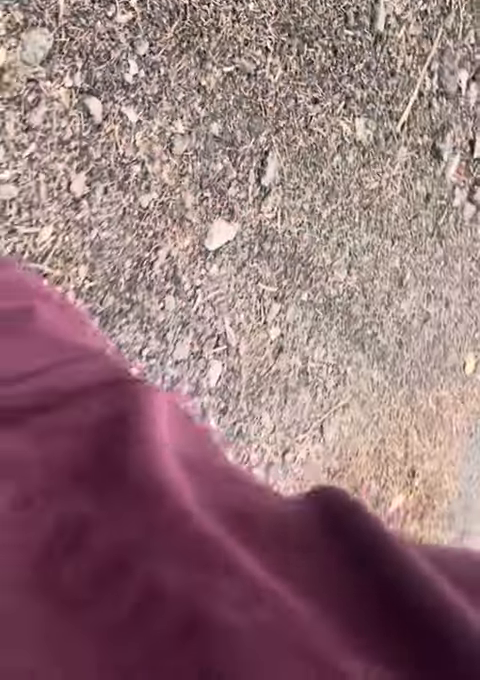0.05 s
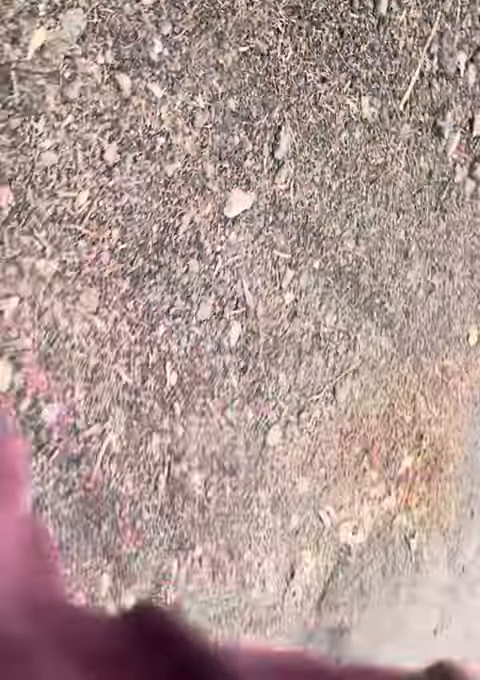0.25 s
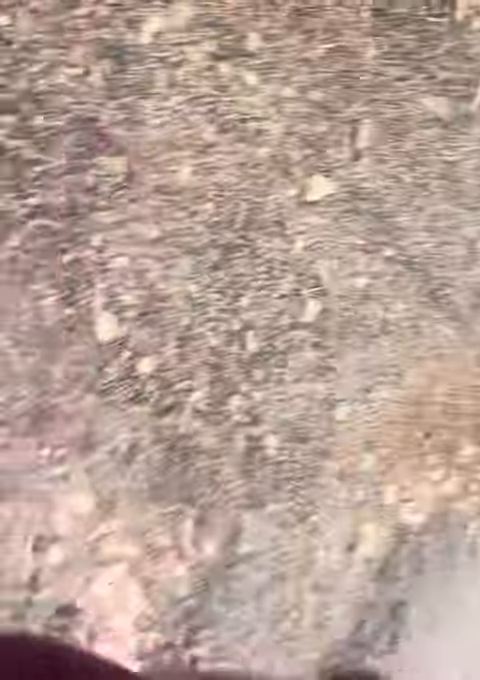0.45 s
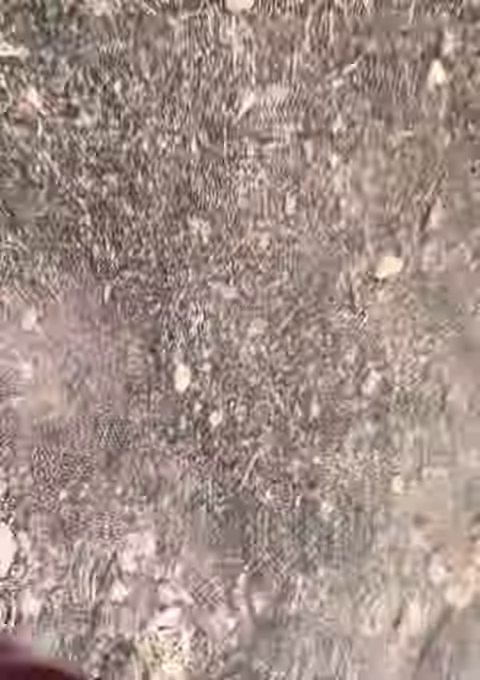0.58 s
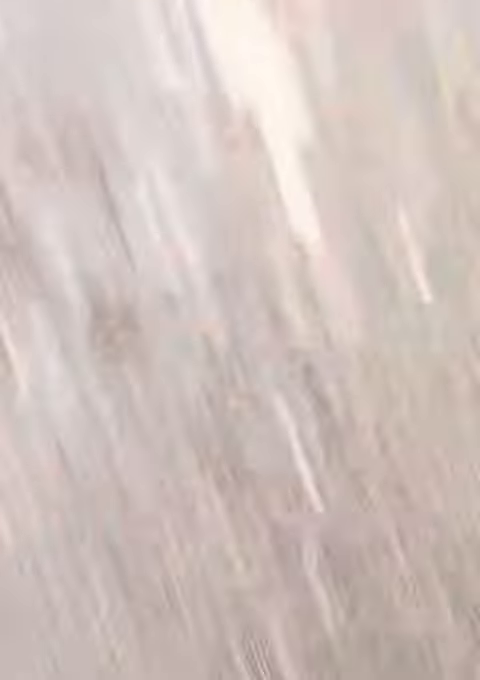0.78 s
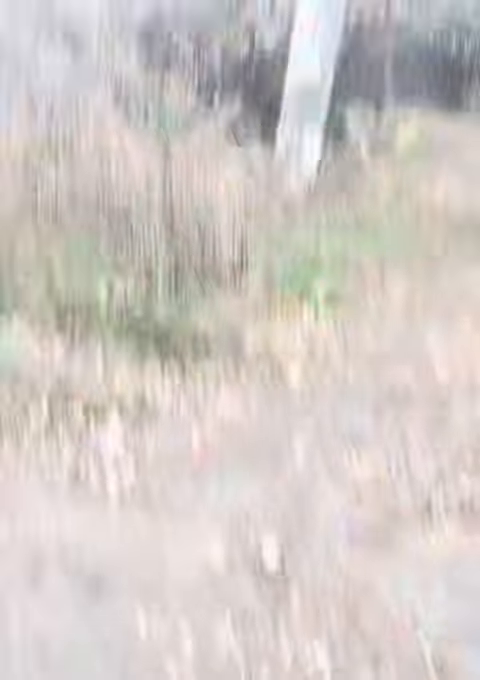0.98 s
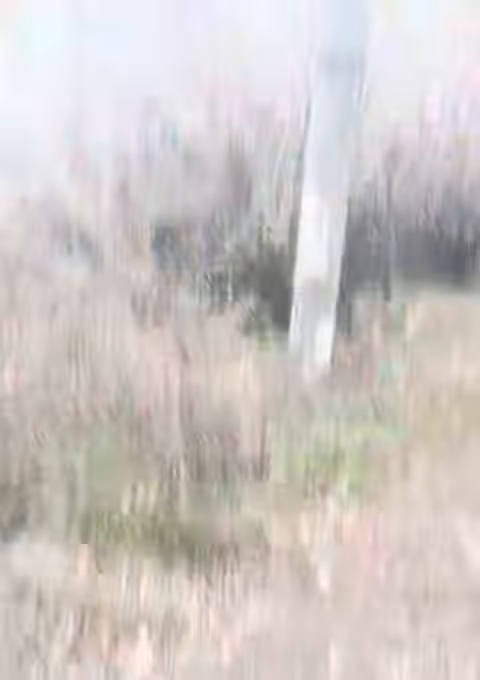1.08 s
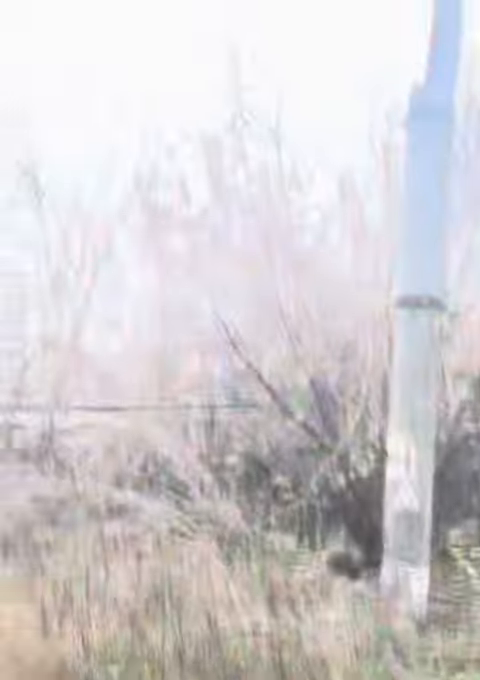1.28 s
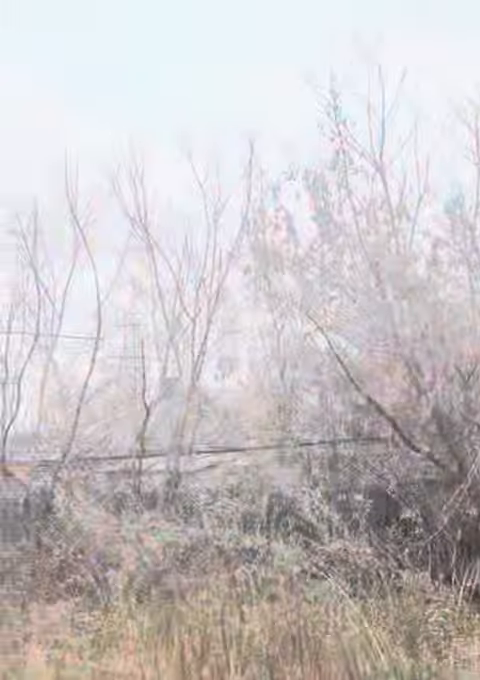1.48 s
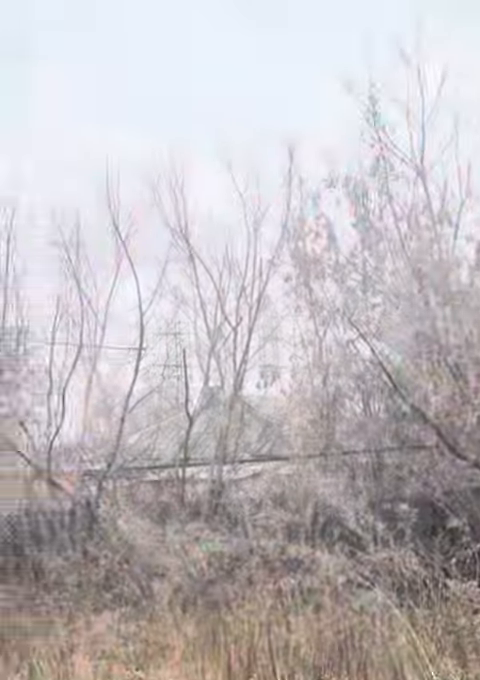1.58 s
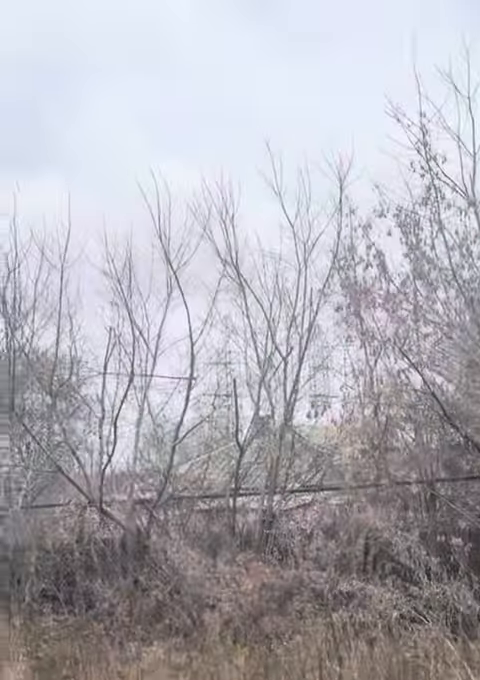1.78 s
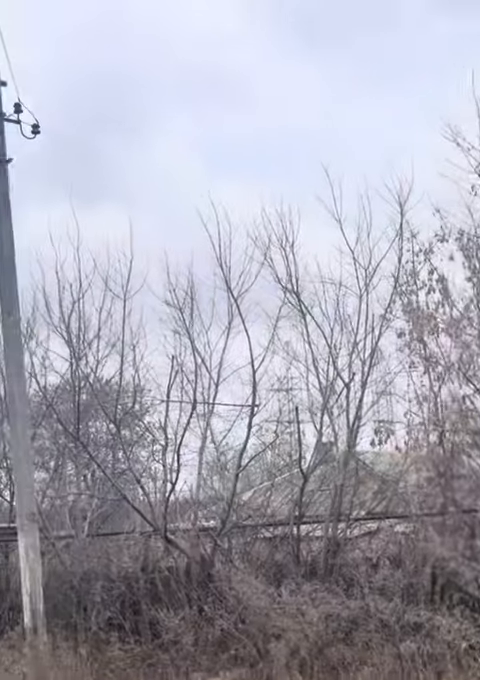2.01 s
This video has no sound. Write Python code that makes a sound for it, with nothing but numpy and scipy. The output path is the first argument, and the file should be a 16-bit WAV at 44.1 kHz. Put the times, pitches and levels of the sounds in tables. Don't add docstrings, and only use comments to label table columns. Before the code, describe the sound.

A heavy explosion hits almost at once with a dull deep thump, then dense echoes and a low rumble fade across open scrubland; faint cloth rustle and dry grit ticks close to the handheld phone.

```python
import sys
import numpy as np
from scipy import signal
from scipy.fft import rfft, irfft, next_fast_len
from scipy.io import wavfile
from scipy.ndimage import uniform_filter1d

SR = 44100
rng = np.random.default_rng(int(sys.argv[2]) if len(sys.argv) > 2 else 0)


def digitize_waveform(pressure):
    field = np.atleast_2d(pressure).T
    bounded = np.clip(field, -1, 1)
    quanta = np.round(bounded * 32767).astype(np.int16)
    wavfile.write(sys.argv[1], SR, quanta)


def invert_db(x):
    u = np.asarray(x, float) / 20
    return 10 ** u


N = 90404
T = np.arange(N) / SR
LOWS = np.geomspace(24, 420, 11)
MIDS = np.geomspace(140, 3600, 13)
HIGHS = np.geomspace(1800, 16500, 10)


def rms_one(x):
    return x / np.sqrt(np.mean(x ** 2) + 1e-20)


def at_hz(points, hz):
    table_hz, value = np.transpose(points)
    return np.interp(np.log(hz), np.log(table_hz), value)


def over_time(points):
    return invert_db(np.interp(T, *np.transpose(points)))


def cut(x, hz, kind, order=2):
    return signal.sosfilt(signal.butter(order, hz, kind, fs=SR, output="sos"), x)


def drift(rate_hz):
    pole = np.exp(-80 * np.pi * rate_hz / SR)
    noise = rng.standard_normal(N // 40 + 2002)
    slow = signal.lfilter([1], [1, -2 * pole, pole * pole], noise)[2000:]
    return np.interp(np.arange(N) / 40, np.arange(len(slow)), rms_one(slow))


def swarm(per_s, spread_db):
    size_db = spread_db * np.minimum(rng.exponential(1, (4, N)), 5)
    size = invert_db(size_db) * rng.choice([-1, 1], (4, N))
    arrives = rng.random((4, N)) < per_s / SR
    return rms_one(size * (arrives + 1e-9)).reshape(2, 2, N)


def banded(source, spectrum, patchy_db, edges, tilt_db=0):
    out, power = 0, 0
    together = drift(2.5)
    for k, (low_hz, high_hz) in enumerate(zip(edges, edges[1:])):
        hz = np.sqrt(low_hz * high_hz)
        flicker_db = patchy_db * (0.6 * together + drift(20))
        band = invert_db(at_hz(spectrum, hz) + flicker_db) * cut(source[k % 2], [low_hz, high_hz], "band")
        out = out + band * invert_db(tilt_db * np.log2(hz / 500))
        power = power + np.mean(band ** 2)
    return out / np.sqrt(power)


# (frequency [Hz], density [dB per Hz])
HUM_SPECTRUM = [(25, -15), (50, 2.5), (103, -5), (346, -23.5), (1400, -30), (2200, -43.5), (3000, -51)]


def hum():
    edges = np.append(LOWS[:6], MIDS[1:])
    return invert_db(-46) * banded(rng.standard_normal((2, 2, N)), HUM_SPECTRUM, 1.8, edges)


# (time [s], level [dB])
RUB = [(0, -67.5), (.17, -65.5), (.215, -51), (.235, -66.5), (.3, -79), (.667, -81.5), (.679, -53.5),
       (.695, -58.5), (.712, -61), (.8, -70), (.87, -72.5), (1.1, -80), (1.16, -73.5), (1.22, -83),
       (1.47, -86), (1.49, -80), (1.53, -89), (2.05, -94)]
# (frequency [Hz], density [dB per Hz])
CLOTH = [(2600, -8), (4600, -1), (6000, 2.5), (8000, -6.5), (10500, -2.5), (12500, -13), (14000, -10),
         (16000, -13.5)]
# (frequency [Hz], density [dB per Hz])
AIR = [(1800, -2), (2700, 5), (4000, 2.5), (5200, 1.5), (6500, -4), (9500, -14.5), (11500, -10),
       (16000, -33.5)]
AIR_DB, HISS_CUT_HZ = -72, 9500
GRAINS_PER_S, GRAIN_SPREAD_DB = 4900, 3.5


def rustle():
    grains = banded(swarm(GRAINS_PER_S, GRAIN_SPREAD_DB), CLOTH, 1.3, HIGHS)
    hiss = banded(rng.standard_normal((2, 2, N)), AIR, 0.6, HIGHS)
    return invert_db(0.5) * over_time(RUB) * grains + invert_db(AIR_DB) * cut(hiss, HISS_CUT_HZ, "low", order=4)


# (time [s], peak level [dB], low edge [Hz], high edge [Hz])
TICKS = [(.153, -48.5, 3520, 4580), (0.185, -47, 3000, 15100), (0.211, -54, 4300, 5200),
         (0.22, -45, 3500, 15500), (0.685, -38, 8500, 11300), (0.69, -56.5, 4000, 10600),
         (0.7606, -33, 5300, 11500), (.739, -63, 7000, 11500), (.781, -51, 6500, 11000),
         (.333, -63.5, 7500, 8420), (.948, -63, 3100, 4200), (0.764, -37.5, 5600, 9900),
         (.770, -42, 6500, 12000), (0.789, -39, 5500, 14500), (0.793, -37.5, 5800, 12700),
         (.8225, -50, 8000, 15000), (0.843, -41, 4400, 15300), (0.981, -54.5, 7000, 15860),
         (1.14, -49.5, 4300, 5630), (1.1388, -55.5, 6500, 11100), (1.145, -56, 3050, 5600),
         (1.181, -58.5, 3640, 5500), (1.474, -56, 2450, 3600), (1.4774, -45, 4850, 6600),
         (1.484, -46, 2500, 4600), (1.492, -52, 2500, 5000)]
TICK_DECAY_S, SNAP = 0.0014, 8.8


def ticks():
    out = np.zeros((2, N + SR))
    noise = rng.standard_normal((len(TICKS), 2, 600))
    noise[:, 0, 0] = SNAP
    for (s, db, low_hz, high_hz), burst in zip(TICKS, noise):
        snap = cut(burst * np.exp(-T[:600] / TICK_DECAY_S), [low_hz, high_hz], "band")
        start = int(s * SR) - 20
        out[:, start:start + 600] += invert_db(db) * snap / np.abs(snap).max()
    return out[:, :N]


def evened(x):
    window_s, share = 0.42, 0.95
    power = uniform_filter1d(x[0] ** 2, size=int(window_s * SR)) + 1e-3
    return x / power ** (share / 2)


# (time [s], level [dB])
BOOM = [(0.235, -15.5), (.3, -17.5), (0.4, -17), (0.5, -19), (.58, -28.5), (0.65, -20.5), (0.8, -24.5),
        (.95, -25.5), (1.05, -27), (1.15, -30), (1.25, -27), (1.4, -33), (1.58, -36), (1.75, -38),
        (1.95, -32), (2.05, -36.5)]
# (frequency [Hz], density [dB per Hz])
RUMBLE = [(25, -20.5), (40, -12.5), (56, -0.5), (95, 2.5), (150, -9), (220, -12), (300, -23), (400, -29.5)]
# (time [s], level [dB], brightness [dB per octave])
ROAR = [
    (0.235, -23, -1.5),
    (0.253, -24.5, 3.5),
    (0.267, -17, 1.5),
    (0.362, -29, 0),
    (0.596, -38, 1),
    (0.99, -39.5, -1),
    (1.876, -49.5, 0.5),
    (1.885, -45.5, -2.5),
    (2.05, -48.5, 1.5),
]
# (frequency [Hz], density [dB per Hz])
SCATTER = [(150, -12), (250, 2), (500, -1.5), (800, -10), (1300, -21.5), (2000, -40), (2800, -48.5),
           (3600, -66)]
FRONT_S, RISE_S = 0.2275, 0.0069
BOOM_TRIM_DB, ROAR_TRIM_DB = -1.83, 0.5
ROLL_CUT_HZ = 2300


def roll():
    boom = evened(banded(swarm(2500, 1.5), RUMBLE, -0.2, LOWS))
    boom = invert_db(BOOM_TRIM_DB) * over_time(BOOM) * boom
    s, db, tilt = np.transpose(ROAR)
    roar = banded(swarm(3000, 1.99), SCATTER, 1.6, MIDS, np.interp(T, s, tilt))
    roar = invert_db(np.interp(T, s, db) + ROAR_TRIM_DB) * roar
    gate = np.clip((T - FRONT_S) / RISE_S, 0, 1) ** 2
    return cut(gate * (boom + roar), ROLL_CUT_HZ, "low", order=4)


# (time [s], peak level [dB], pulse length [ms], polarity
ECHOES = [(0.2349, 0.3, 7.4, -1), (0.2477, -2.5, 11, -1), (0.2694, -1.5, 10, -1), (0.2812, -10.5, 7.2, 1),
          (0.293, -6, 8.7, 1), (0.3033, -1.5, 7.6, 1), (0.3125, -3.5, 9.6, 1), (0.3319, -13, 14, 1),
          (0.3503, -6, 10.1, 1), (0.3671, -3, 13.1, 1), (0.3928, -7, 7.3, 1), (0.4151, -8, 8.6, 1),
          (0.4239, -4.5, 12, 1), (0.4356, -4.5, 9.3, 1), (0.466, -6.5, 11.0, 1), (0.4747, -10.5, 11, 1),
          (0.4987, -11, 11.0, 1), (0.5351, -9.0, 10, 1), (0.5524, -12, 10.1, 1), (0.5714, -8.6, 9.3, 1),
          (0.6716, -12, 13, 1), (0.7013, -21, 25, 1), (0.7125, -17, 17.0, 1), (0.7263, -8.5, 14, 1),
          (0.7449, -14.2, 14, 1), (0.7909, -13, 8.5, 1), (0.8348, -11.5, 12.0, 1), (0.849, -17.5, 12.0, 1),
          (0.8659, -12.5, 15.6, 1), (0.8812, -14.5, 13, 1), (0.9023, -14, 16, 1), (0.9143, -22.5, 15, 1),
          (0.9319, -16, 12.0, 1), (0.9659, -21, 8.1, 1), (0.9949, -17, 16, 1), (1.0053, -16.5, 9.3, 1),
          (1.0862, -18.5, 8.5, 1), (1.1152, -14.5, 12, 1), (1.1474, -20, 15, 1), (1.1798, -18.5, 15, 1),
          (1.1929, -17, 23, 1), (1.227, -19.5, 18, 1), (1.3327, -20.5, 25, 1), (1.3868, -31.5, 8.1, 1),
          (1.4769, -26, 10.1, 1), (1.6364, -25.5, 11.0, 1), (1.7333, -19, 11, 1), (1.8734, -23.5, 16.4, 1),
          (1.9298, -27, 43, 1), (1.9944, -18.5, 11.0, 1),
          (0.242, -8.5, 4.8, 1), (0.2654, -3, 1.6, 1), (.2735, -6.5, 8.3, 1), (0.2801, -7, 5.5, 1),
         (0.3201, -13, 4.5, 1), (0.3305, -10, 6.5, 1), (.381, -18, 6.2, 1), (.402, -12.5, 4.3, 1),
         (.448, -14.5, 6.6, 1), (0.481, -15.5, 6.2, 1), (.608, -18.5, 4.4, 1), (0.686, -21, 12, 1),
         (1.03, -24, 10, 1), (1.048, -23, 5, 1), (1.059, -23.5, 9.9, 1)]
ECHO_CUT_HZ, ECHO_TRIM_DB = 1100, 0.5
CRACK_DB, CRACK_FADE_DB_PER_S, CRACK_S = -30, 50, 0.0067
CRACK_LOW_HZ, CRACK_HIGH_HZ = 420, 840


def echoes():
    pulses, crack = np.zeros(N), np.zeros(N)
    for s, db, ms, polarity in ECHOES:
        u = (T - s) / (ms / 4000)
        pulses += polarity * invert_db(db + ECHO_TRIM_DB) * (1 - u * u) * np.exp(-u * u / 2)
        late = np.maximum(T - s + ms / 2500, 0) / CRACK_S
        crack_db = db + CRACK_DB - CRACK_FADE_DB_PER_S * (s - FRONT_S)
        crack += invert_db(crack_db) * np.tanh(8 * late) * np.exp(-late)
    rough = cut(rng.standard_normal((2, N)), [CRACK_LOW_HZ, CRACK_HIGH_HZ], "band", order=1)
    rough = rms_one(cut(rough, 2000, "low", order=3))
    return cut(pulses, ECHO_CUT_HZ, "low") * [[1], [0]] + crack * rough


# (time [s], level [dB])
BUZZ = [
    (.235, -100),
    (.245, -72),
    (.45, -77),
    (.58, -82.5),
    (.62, -100),
    (1.41, -100),
    (1.425, -76),
    (1.47, -95),
    (1.49, -100),
]


def buzz():
    sizzle = cut(rng.standard_normal(N), [9400, 9900], "band", order=3)
    return over_time(BUZZ) * rms_one(sizzle)


SHOCK_S, SHOCK_DB = 0.2366, -20


def shock():
    edge = np.zeros(N)
    edge[int(SHOCK_S * SR)] = 1
    return invert_db(SHOCK_DB) * cut(edge, [1500, 7000], "band", order=1)


# (frequency [Hz], likeness [0-1])
LIKENESS = [(130, .98), (290, .97), (640, 0.8), (1000, .45), (1700, .6), (4200, .3), (6000, .97),
            (12000, 0.98)]
# (frequency [Hz], lead [rad])
LEAD = [(200, -.05), (430, -1), (700, -1.8), (1800, -.1), (3000, 2), (5000, 1.8), (6200, 3.14),
        (15600, 12.57)]
# (frequency [Hz], difference [dB])
BALANCE = [(60, .6), (130, .6), (380, 2), (700, .8), (1100, -5.5), (2400, 2.5), (4400, -1), (9000, 1)]
LEFT_DB = 1.4
TURN_S, TURN_LENGTH_S = 0.6, 0.46
FACING_SHARE, FACING_HZ = 0.48, 2160


def ports(shared, unshared):
    size = next_fast_len(N + 4096)
    hz = np.maximum(np.arange(size // 2 + 1) * SR / size, 1)
    side = np.array([[0.5], [-0.5]])
    shared, unshared = rfft(shared, size), rfft(unshared, size)
    poses = []
    for share in (1, FACING_SHARE):
        skew = 1 - (1 - share) / (1 + (hz / FACING_HZ) ** 6)
        unlike = skew * np.clip(1 - at_hz(LIKENESS, hz), 0, 1)
        lead = skew * np.interp(hz, *np.transpose(LEAD))
        balance_db = LEFT_DB + skew * (at_hz(BALANCE, hz) - LEFT_DB)
        pair = np.sqrt(1 - unlike / 2) * shared + 2 * side * np.sqrt(unlike / 2) * unshared
        pair = pair * invert_db(side * balance_db) * np.exp(1j * side * lead)
        poses.append(irfft(pair, size)[:, :N] * np.sqrt(2))
    turned = np.clip((T - TURN_S) / TURN_LENGTH_S, 0, 1)
    return (1 - turned) * poses[0] + turned * poses[1]


def scene():
    grit = ticks()
    airborne = hum() + rustle() + invert_db(4.0) * grit + roll() + echoes() / np.sqrt(2)
    shared, unshared = np.pad(airborne, ((0, 0), (0, 2000)), "reflect")
    through_casing = invert_db(-8.5) * grit[0]
    return ports(shared, unshared) + buzz() + shock() + through_casing


def roll_off(x):
    return signal.sosfilt(signal.butter(12, 16500, fs=SR, output="sos"), x)


def record(dry):
    top, fade_s = 1.05, 0.005
    x = top * np.tanh(cut(dry, 35, "high", order=3) / top)
    x = x * np.clip((T[-1] - T) / fade_s, 0, 1)
    mix = signal.sosfilt(signal.cheby2(12, 70, 16600, fs=SR, output="sos"), x)
    return roll_off(mix)


dry = scene()
out = record(dry)
digitize_waveform(out)
```